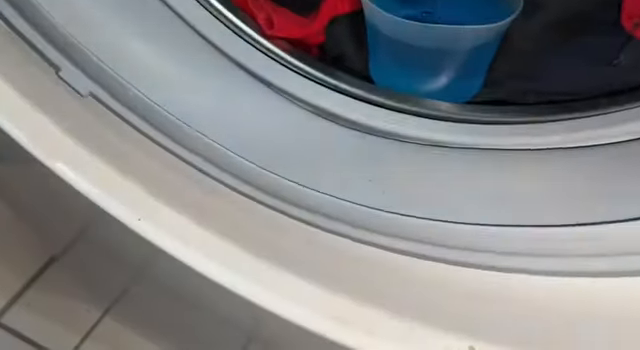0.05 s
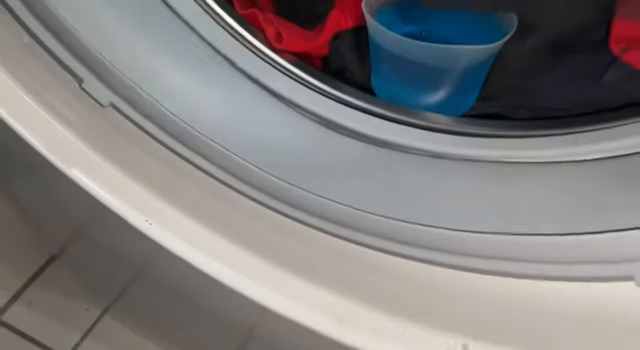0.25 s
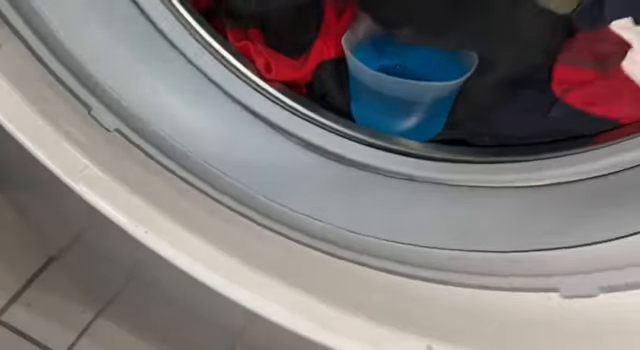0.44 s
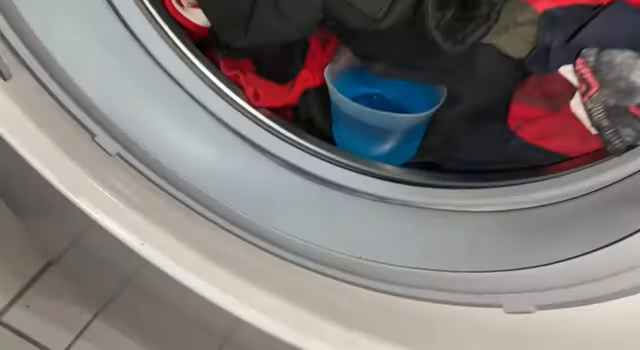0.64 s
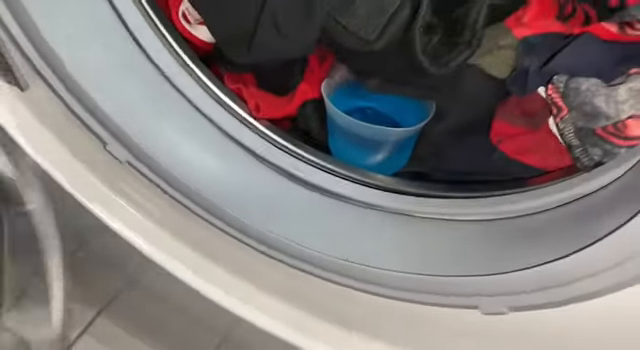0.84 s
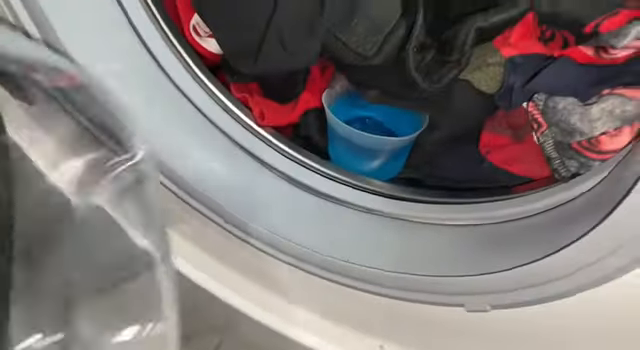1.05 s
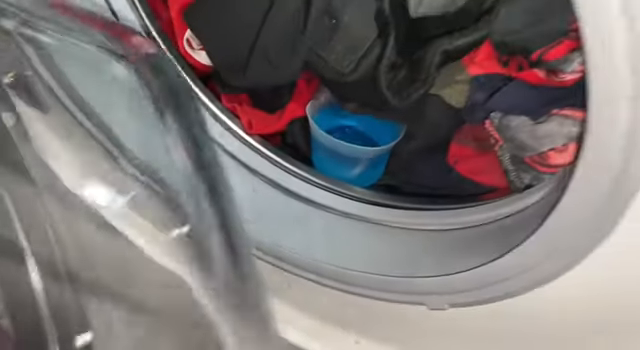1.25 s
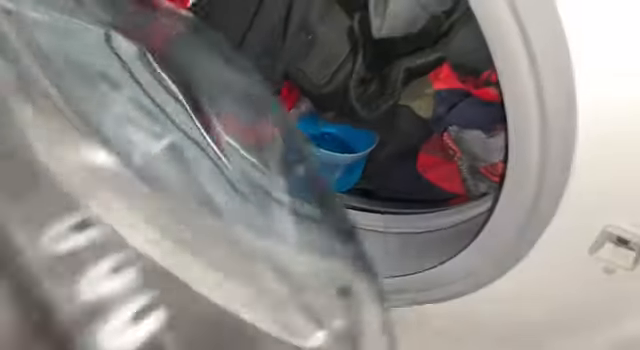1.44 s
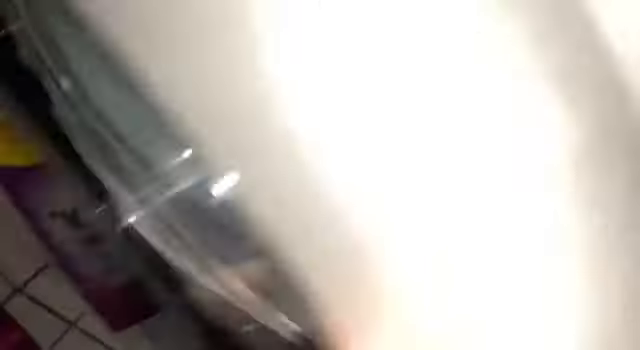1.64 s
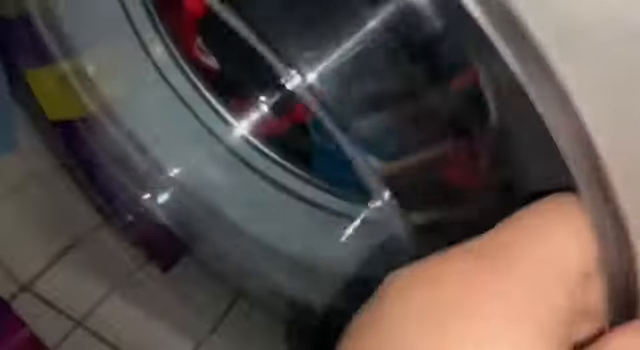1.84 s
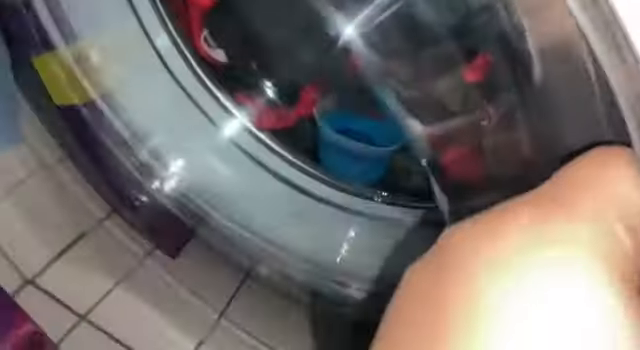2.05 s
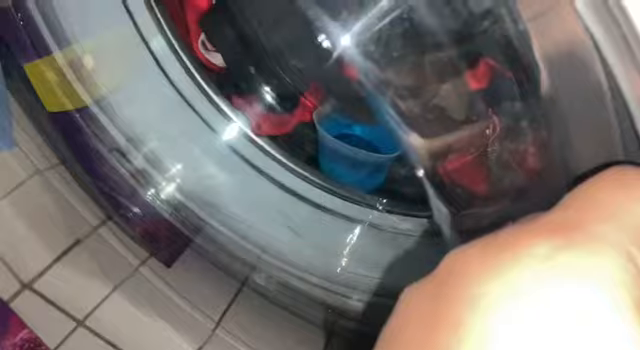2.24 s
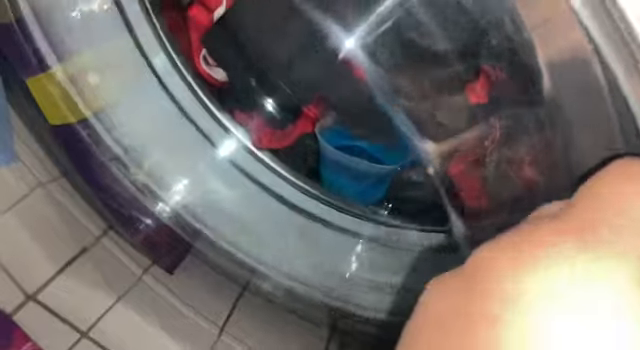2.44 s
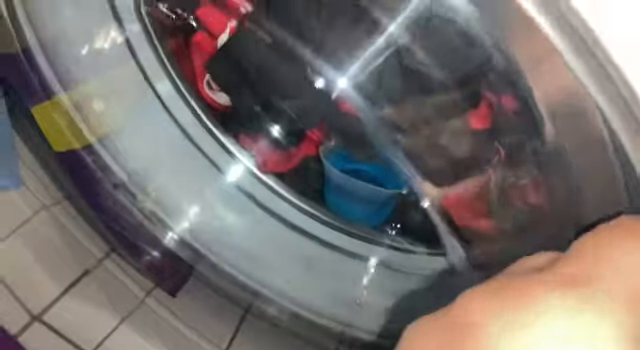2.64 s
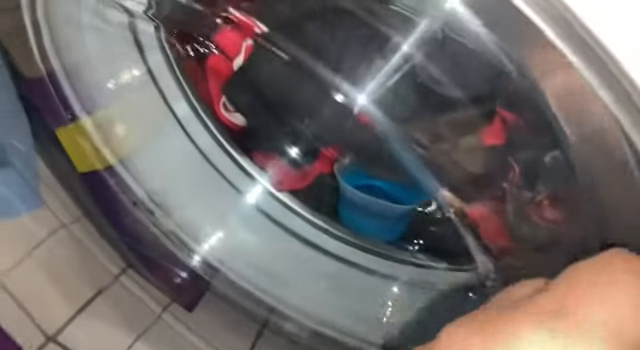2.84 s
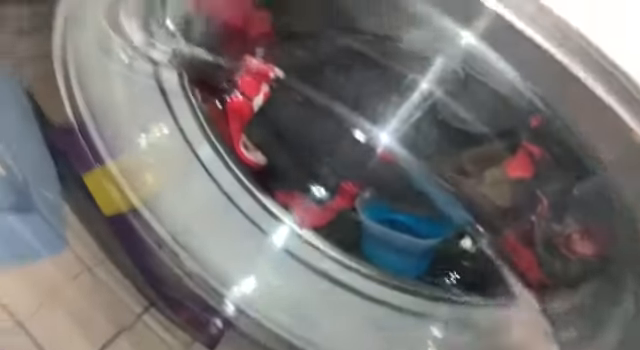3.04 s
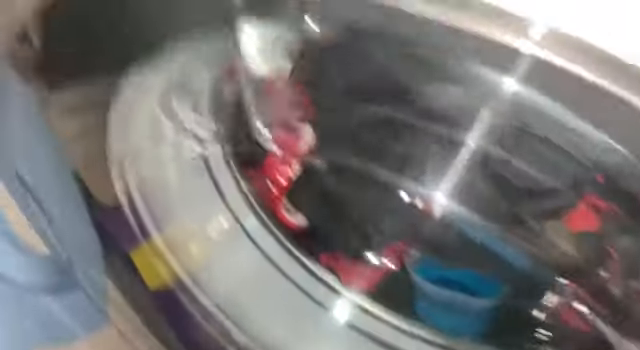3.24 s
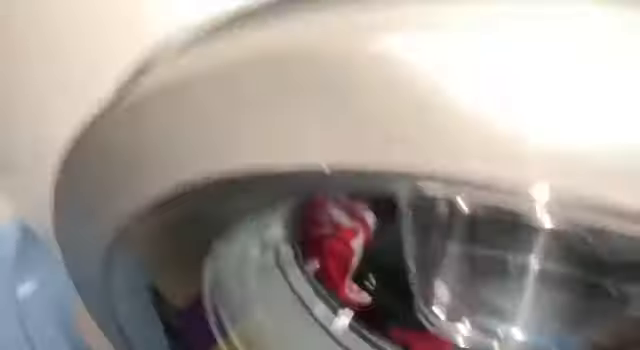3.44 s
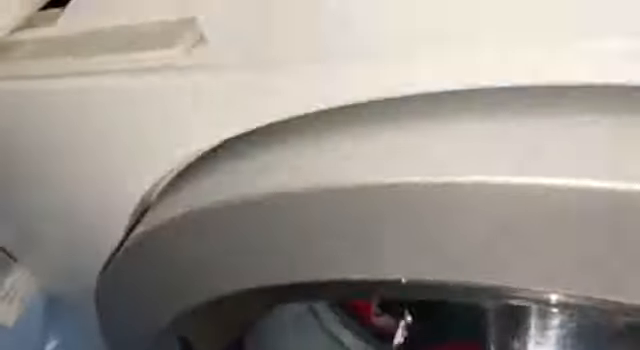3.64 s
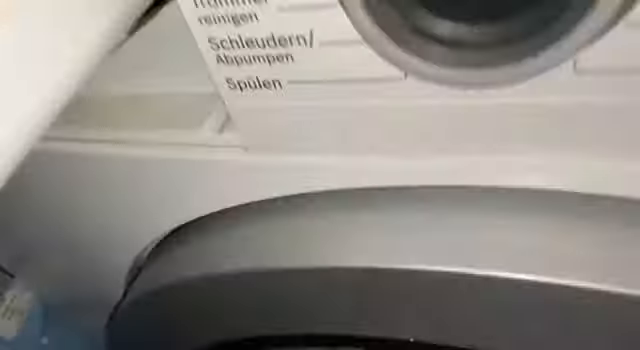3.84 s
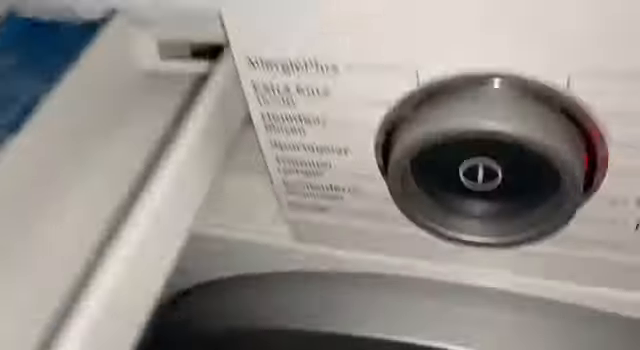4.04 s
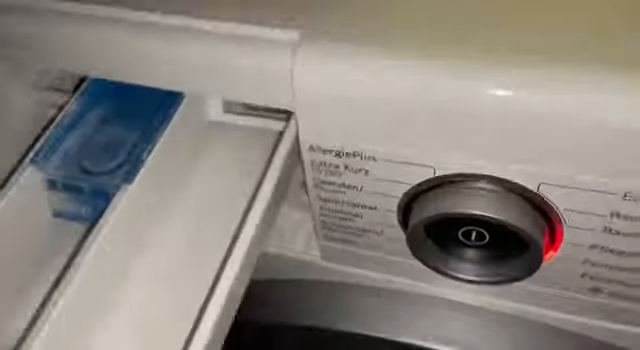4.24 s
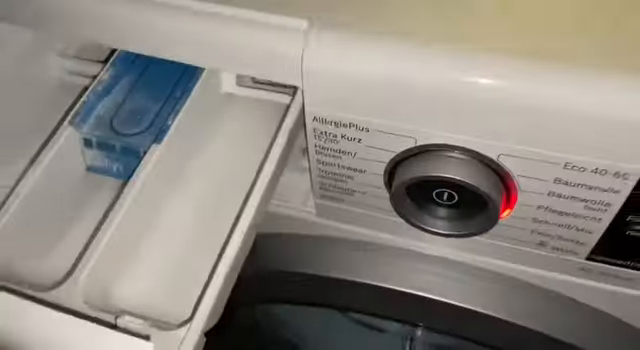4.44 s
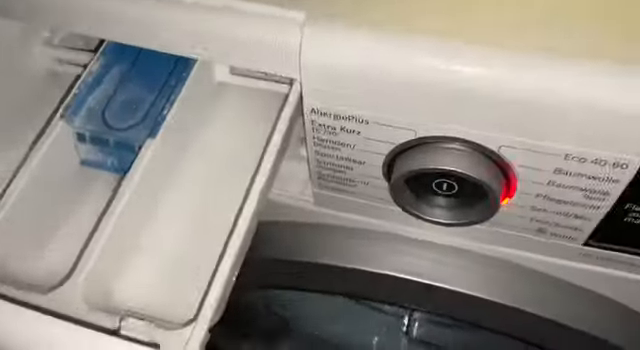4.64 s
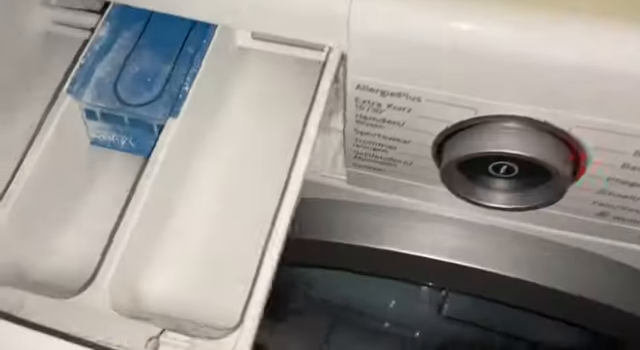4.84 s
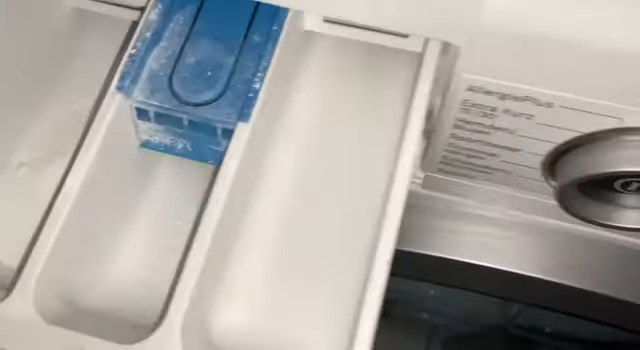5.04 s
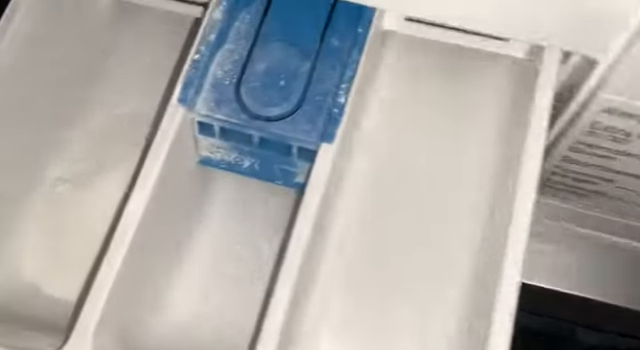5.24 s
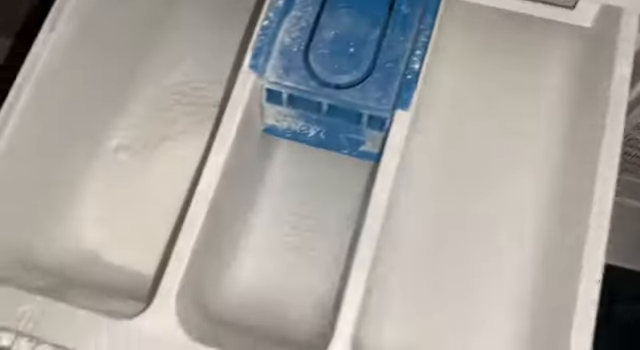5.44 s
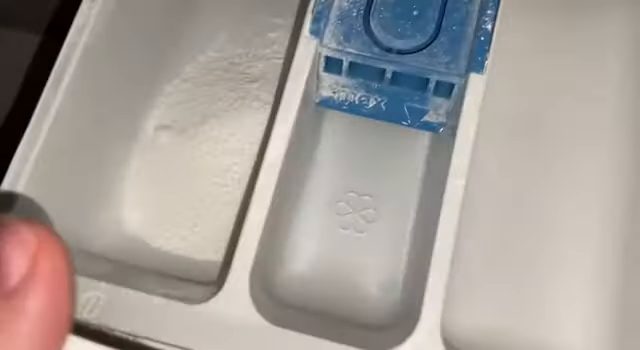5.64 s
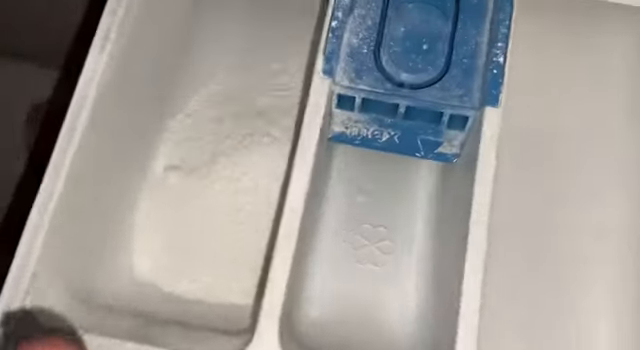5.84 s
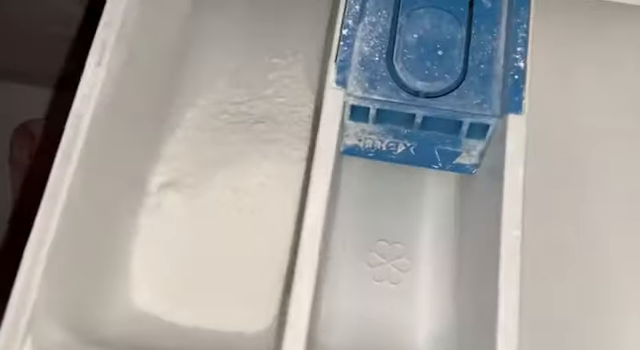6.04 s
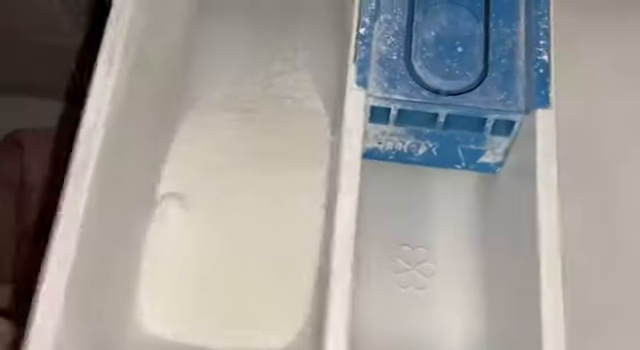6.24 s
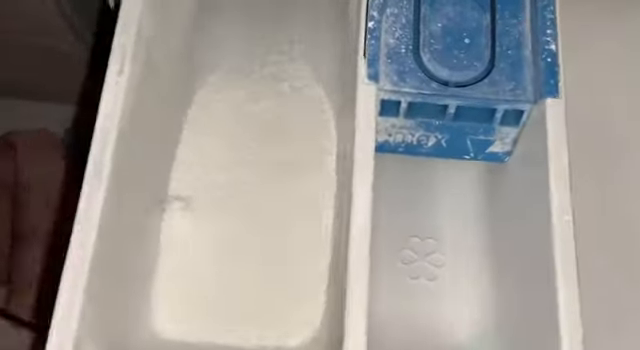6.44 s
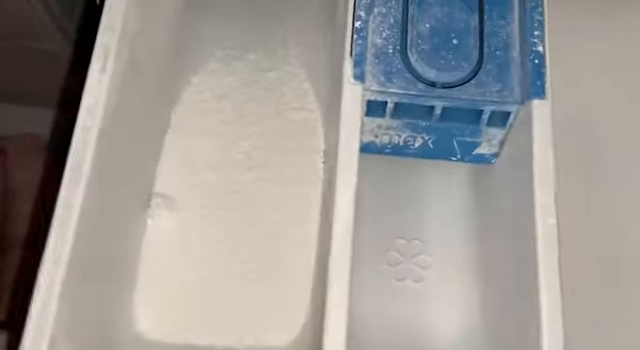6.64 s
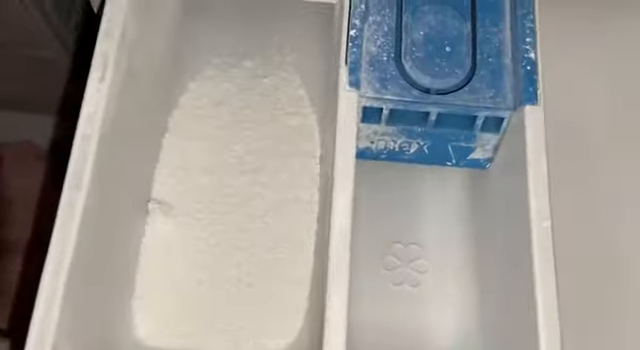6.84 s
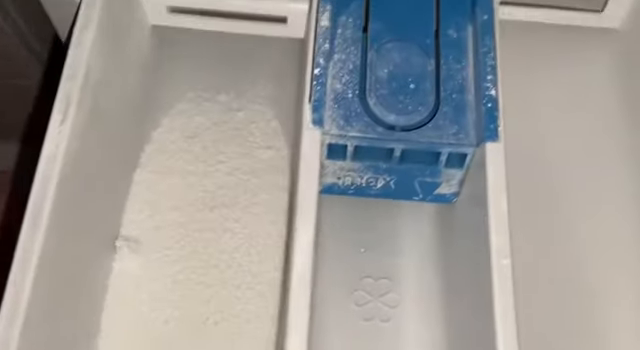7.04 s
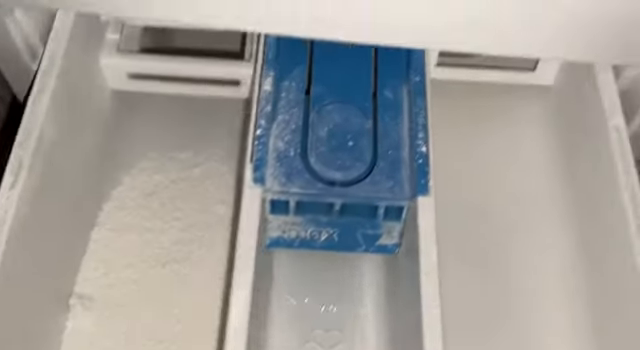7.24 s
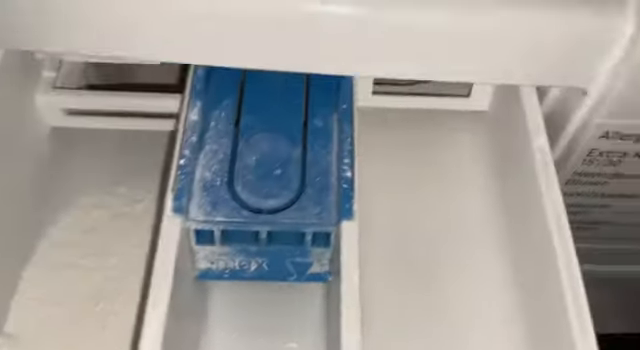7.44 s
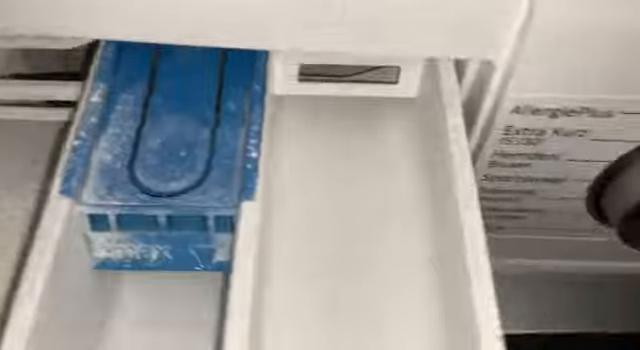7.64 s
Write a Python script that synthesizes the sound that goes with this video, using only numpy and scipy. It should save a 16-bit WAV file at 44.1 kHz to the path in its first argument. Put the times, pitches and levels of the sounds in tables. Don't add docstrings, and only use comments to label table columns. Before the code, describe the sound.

A small tiled room, heard through a handheld phone close to a washing machine. From 0 to 1.8 s it is nearly quiet: low handling rumble, faint cloth rustle, and tiny plastic hinge clacks between 0.55 and 1.2 s. Around 1.97 s the door bumps its rubber seal with a dull, moderate thud. At 2.4 to 2.45 s comes the loudest event, a tight cluster of hits: deep thump, sharp latch snap, ringing steel panels and a low boom lingering under a second. At 2.6 to 2.8 s the handle clicks back and a spring buzzes faintly. From 3.1 to 5.7 s the phone case creaks and ticks, strongest near 3.3, with sleeve hiss, rubbing soles and light taps. From 5.8 to 6.85 s a hollow plastic drawer rattles and knocks in quick uneven bursts, hardest near 6.2, 6.35 and 6.5. Soft rustle and faint creaks close by 7.7 s.

```python
import sys
import numpy as np
from scipy import signal
from scipy.fft import rfft, irfft, next_fast_len
from scipy.io import wavfile
from scipy.ndimage import uniform_filter1d, minimum_filter1d, map_coordinates

SR = 44100
rng = np.random.default_rng(int(sys.argv[2]) if len(sys.argv) > 2 else 0)


def store_wav(level_fs):
    pcm = np.round(np.clip(np.atleast_2d(level_fs), -1, 1) * 32767)
    wavfile.write(sys.argv[1], SR, pcm.T.astype(np.int16))


def elevation(decibels):
    levels = np.asarray(decibels, float)
    return 10 ** (levels / 20)


N = 339570


def unit(x):
    return x / np.sqrt(np.mean(x ** 2) + 1e-20)


def along(points, hz):
    f, v = np.transpose(points)
    return np.interp(np.log(hz + 1), np.log(f + 1), v)


def curves(rows):
    s, *cols = np.transpose(rows)
    return [np.interp(np.arange(N) / SR, s, c) for c in cols]


def wobble(rate):
    knots = rng.standard_normal(int(N * rate / SR) + 4)
    return map_coordinates(knots, [np.arange(N) * rate / SR], order=1)


def filtered(x, response):
    m = next_fast_len(x.shape[-1] + 4096)
    return irfft(rfft(x, m) * response(np.fft.rfftfreq(m, 1 / SR)), m)[..., :x.shape[-1]]


def colour(spectrum):
    return lambda hz: elevation(along([(0.0085, -120)] + list(spectrum) + [(SR / 2, -120)], hz))


def rush(spectrum, patchy_db, grain_db, grain_hz):
    z = signal.stft(rng.standard_normal((2, N)), nperseg=512)[2]
    field = uniform_filter1d(rng.standard_normal(z.shape[1:]), size=6, axis=0)
    field = uniform_filter1d(field, size=10, axis=1)
    pair = signal.istft(z * elevation(patchy_db * unit(field)), nperseg=512)[1][:, :N]
    return unit(filtered(pair * elevation(grain_db * wobble(grain_hz)), colour(spectrum)))


def add(track, s, sound):
    part = track[round(s * SR):][:len(sound)]
    part += sound[:len(part)]


def onset(seconds, rise_s):
    return 1 - np.exp(-np.arange(round(seconds * SR)) / SR / rise_s)


def ring(modes, seconds, scatter_db, shift=1):
    t = np.arange(round(seconds * SR)) / SR
    hz, db, t60 = np.transpose(modes)[:, :, None]
    sense = (-1) ** np.arange(len(modes))[:, None]
    level = elevation(db + scatter_db * rng.standard_normal(db.shape) - 60 * t / t60)
    return np.sum(sense * level * np.sin(2 * np.pi * hz * shift * t), axis=0)


def crack(t60, response, rise=0.00034):
    t = np.arange(SR // 8) / SR
    noise = unit(filtered(rng.standard_normal(len(t)), response))
    return noise * elevation(-60 * t / np.clip(t60, .002, 1)) * (1 - np.exp(-t / rise))


def swells(rows, rest_db, fade_db=22):
    t = np.arange(0, N, 64)[:, None] / SR
    s, rise, fall, db = np.transpose(rows)
    away = np.maximum((s - t) / np.abs(rise), (t - s) / np.abs(fall))
    top_db = np.max(db - fade_db * away, axis=1)
    return np.maximum(np.interp(np.arange(N) / SR, t[:, 0], top_db), rest_db)


# [t/s, thump level/dB, panel level/dB, contact time/ms]
DOOR_BLOWS = [(1.885, -75.5, -55.5, 6.3), (1.904, -58.5, -40.5, 1.2), (1.936, -62, -38, 1),
              (1.972, -18.5, -17.5, 3.1), (1.984, -37.5, -49, 1.6), (2.328, -63, -49, 0.78),
              (2.385, -42.5, -25, 1), (2.399, -13.5, -22.5, 1), (2.426, -31.5, -14.5, 2.6),
              (2.436, -3, -12.5, 6.5), (2.446, -28, -1, 2.4), (2.455, -34, -20.5, 2)]
# [f/Hz, level/dB, time to die by 60 dB/s]
PANEL_NOTES = [(200, -6.5, 0.24), (220, -11, 0.15), (263, -13, 0.3), (307.5, -2, 0.15), (361, -4.5, .3),
               (387.5, -4.5, 0.2), (443, -8, 0.16), (525, -10.5, .3), (600, -10.5, 0.22),
               (815, -10.5, 0.13), (1110, -5.5, 0.12), (1280, -3.5, .15), (1444, -13.5, .07)]
# [f/Hz, level/dB, time to die by 60 dB/s]
SHELL_NOTES = [(30, -23.5, 0.88), (61.5, 1.5, 0.77), (94, 0, 0.33), (140, -5, 0.58), (153.87, -5, 0.4)]
# [f/Hz, level/dB]
THUD_COLOUR = [(60, -21), (110, 11), (250, 1), (400, -3), (800, -11.5), (1500, -24), (2500, -30)]


def blows():
    lows, hits = np.zeros((2, N))
    t = np.arange(round(1.5 * SR)) / SR
    squash_hz, squash_s = 23, 0.022
    lag_turns = .28
    cycles = 64.5 * t + squash_hz * squash_s * (1 - np.exp(-t / squash_s)) - lag_turns
    thump = 5.6 * (t / 0.02056) ** 2 * np.exp(-t / 0.014) * np.sin(2 * np.pi * cycles)
    hum = ring(SHELL_NOTES, 1.5, 0) * onset(1.5, 0.061)
    for s, thump_db, panel_db, contact_ms in DOOR_BLOWS:
        push = np.hanning(round(contact_ms * SR / 1000) + 3)
        add(lows, s, elevation(thump_db) * thump + elevation(1.365 * thump_db + 0.5) * hum)
        panels = ring(PANEL_NOTES, .6, 2.5)
        add(hits, s, elevation(panel_db - 17.0) * np.convolve(panels, push / push.sum()))
        add(hits, s, elevation(panel_db + 0.5) * crack(0.051, colour(THUD_COLOUR), rise=0.0048))
    return lows, hits


# [t/s, peak level/dB, tilt/dB per octave]
LATCH_HITS = [(1.933, -57, -1), (1.9702, -33, -3.5), (2.002, -48.5, 2.5), (2.3281, -41, -1),
              (2.358, -45, 3), (2.3881, -15, -9.5), (2.395, -20, -4.5), (2.4268, -6, 1.5),
              (2.434, -11.5, -8.5), (2.4458, -20, 3.5), (2.4533, -10, -1.5), (2.4634, -32, -6.5),
              (2.612, -33, -7)]
# [f/Hz, level/dB]
SNAP_COLOUR = [(300, -13), (900, 3), (2200, -4), (3300, 3), (5500, -2.5), (8000, -2.5), (10500, -8.5),
               (12400, -10.5)]


def latch():
    ticks = np.zeros(N)
    for s, db, tilt_db in LATCH_HITS:
        tilted = lambda hz: colour(SNAP_COLOUR)(hz) * elevation(tilt_db * np.log2((hz + 1) / 3000))
        add(ticks, s, elevation(db - 6.0) * crack(0.028, tilted, rise=0.0011))
    return ticks


# [f/Hz, level/dB, time to die by 60 dB/s]
BOWL_NOTES = [(250, -8, 0.023), (299, -3, 0.068), (361, 3, 0.077), (390, -1, 0.06), (614, -7.5, 0.052),
              (1405, -13, 0.046)]


def bowl():
    x = np.zeros(N)
    t = np.arange(SR // 4) / SR
    notes = sum(elevation(db - 60 * t / t60) * np.sin(2 * np.pi * hz * t) for hz, db, t60 in BOWL_NOTES)
    add(x, 2.439, elevation(-14.5) * onset(1 / 4, 0.0043) * notes)
    return x


# [f/Hz, level/dB, time to die by 60 dB/s]
HOOK_NOTES = [(3500, -4, .06), (3720, -8, .05), (4110, -6, .05), (10870, -6, .04)]


def hook():
    x = np.zeros(N)
    add(x, 2.44, elevation(-24.5) * ring(HOOK_NOTES, .3, 0))
    return x


# [t/s, peak level/dB]
SPRING_BUZZES = [
    (2.664, -49),
    (2.679, -42),
    (2.6915, -49.5),
    (2.7068, -41),
    (2.7178, -40),
    (2.729, -46.5),
    (2.7435, -42.5),
    (2.7653, -44.5),
]
# [f/Hz, level/dB]
COIL_COLOUR = [(1500, -5), (2600, -1.5), (3600, -14), (5100, -3), (7500, 1.5), (9000, -9), (10100, 2),
               (11500, -17)]


def handle_and_spring():
    x = np.zeros(N)
    handle = [(808, 7.0, 0.033), (1201, 4.5, 0.011), (2240, -22, 0.0071), (3500, -1.5, 0.0098)]
    add(x, 2.613, elevation(-22.5) * ring(handle, .08, 0))
    for s, db in SPRING_BUZZES:
        add(x, s, elevation(db + 7.0) * crack(0.0075, colour(COIL_COLOUR), rise=0.00074))
    return x


# [t/s, peak level/dB, f/Hz, bright level/dB]
HINGE_KNOCKS = [
    (0.553, -43, 297, -30),
    (0.674, -48.5, 1480, 5.5),
    (.783, -51.5, 656, 7),
    (0.876, -57, 526, 11),
    (0.914, -44.5, 1520, -1),
    (1.156, -52.5, 322, -15),
]
# [f/Hz, level/dB]
CLACK_COLOUR = [(250, -4.5), (500, 6), (1000, 7.5), (2000, -6), (3000, -2), (4500, -13), (8000, -26.5)]
# [f/Hz, level/dB]
SOLE_COLOUR = [(500, -21.5), (1000, -9.5), (1700, -5.5), (2400, -4), (3200, -1), (4500, -7.5), (7000, -16),
               (12000, -34.5)]


def hinge():
    knocks, ticks = np.zeros((2, N))
    for s, db, hz, bright_db in HINGE_KNOCKS:
        clack = crack(.05, colour(CLACK_COLOUR), rise=.002)
        add(knocks, s, elevation(db - 4) * (clack + .5 * ring([(hz, 0, .025)], 1 / 8, 0)))
        add(ticks, s, elevation(db + bright_db) * crack(0.02, colour(SOLE_COLOUR), rise=0.0027))
    return knocks, ticks


def door():
    lows, hits = blows()
    knocks, hinge_ticks = hinge()
    ticks = latch() + bowl() + hinge_ticks
    return lows + handle_and_spring() + ticks, hits + hook() + knocks + elevation(-0.5) * ticks


# [contact t/s, level/dB, build-up time/s]
DRAG_EVENTS = [
    (1.936, -58.5, 0.072),
    (1.972, -45.5, 0.034),
    (2.389, -41, 0.036),
    (2.428, -33, 0.05),
    (5.918, -58, 0.045),
]


def drags():
    x = np.zeros(N)
    for s, db, build_s in DRAG_EVENTS:
        add(x, s - 1 / 8, elevation(db) * crack(2 * build_s, colour(SNAP_COLOUR), rise=0.0034)[::-1])
    return x


# [t/s, peak level/dB, tray ring level/dB, bright level/dB, wall f/Hz]
STOP_HITS = [
    (5.915, -22.5, -17, -6, 581),
    (6.004, -20.5, -2.5, -37, 814),
    (6.102, -26, 1, -23, 568.5),
    (6.180, -14.5, -3, -30, 1005),
    (6.267, -27, -3, -19.5, 455.3),
    (6.343, -12.5, -5.5, -10.5, 1107),
    (6.506, -10, -11.5, -12, 1009),
]
# [t/s, peak level/dB, tray ring level/dB, bright level/dB, wall f/Hz]
RAIL_KNOCKS = [(5.792, -34, -6.5, -19, 1067), (5.812, -27.5, -12, -20.5, 571),
               (5.896, -36, 1.5, -37, 525.5), (5.925, -23.5, 3.5, 1, 1324), (5.970, -29, 8, -9.5, 600),
               (5.992, -28, -2, -26, 821), (6.088, -30.5, 1.5, -22, 700), (6.108, -28.5, 4.5, -20, 548),
               (6.259, -29.5, 0, -28, 1181), (6.277, -22, -9.5, -24, 1085), (6.36, -31.5, -4, 11.5, 810),
               (6.38, -31.5, -1.5, -17.5, 823), (6.402, -18, -12.5, -37.5, 820),
               (6.429, -18, -8, -23.5, 600), (6.451, -29, -7, 3.5, 664), (6.485, -29, -3, -26, 900),
               (6.522, -33, 4.5, -15.5, 803), (6.55, -24.5, -9.5, -29.5, 826),
               (6.578, -19, -9.5, -23.5, 526), (6.582, -30.5, 9, -31, 800), (6.608, -43.5, -4, -20.5, 813),
               (6.648, -35, -2.5, -34, 684), (6.668, -34.5, 1, -15, 608), (6.69, -46.5, 12.5, -27, 497),
               (6.734, -57, 12, -20.5, 600), (6.791, -42, 2.5, -34, 652), (6.825, -26.5, -7, -26, 1126)]
# [f/Hz, level/dB, time to die by 60 dB/s]
TRAY_NOTES = [(178.5, -9.5, 0.094), (210, 2.5, 0.15), (255, -10.5, 0.051), (314, -18, 0.21)]
# [f/Hz, level/dB, time to die by 60 dB/s]
WALL_NOTES = [(413, 4.5, 0.1), (595, 8, 0.045), (803, 19.5, 0.04), (1020, 6, 0.0089), (1350, -2, 0.0079),
              (1990, -6.5, 0.082), (2675, 3, 0.0087)]
# [t/s, f/Hz]
HOLLOW_PITCH = [(5.9, 236.4), (6.0, 221.7), (6.1, 239), (6.18, 202.2), (6.27, 202.7), (6.34, 206.3),
                (6.43, 227.4), (6.58, 222.3), (6.65, 244.6), (6.83, 240)]


def drawer():
    hollow, x = np.zeros((2, N))
    touches = [(s - .0115, db - 17.5, tray_db + 9, -18, hz) for s, db, tray_db, _, hz in STOP_HITS]
    for s, db, tray_db, bright_db, wall_hz in STOP_HITS + RAIL_KNOCKS + touches:
        spot = 1 + .08 * rng.standard_normal()
        shift = np.interp(s, *np.transpose(HOLLOW_PITCH)) / TRAY_NOTES[1][0]
        tray = onset(1 / 4, 0.0043) * ring(TRAY_NOTES, 1 / 4, 2.5, shift=shift)
        add(hollow, s, elevation(db + tray_db + 1.5) * tray)
        walls = ring(WALL_NOTES, 1 / 8, 5, shift=spot)
        struck = ring([(wall_hz, 0, .035)], 1 / 8, 0)
        tilted = lambda f: colour(CLACK_COLOUR)(f) * elevation(9 * (spot - 1) * np.log2((f + 1) / 1500))
        clack = crack(0.038, tilted, rise=0.00099)
        add(x, s, elevation(db - 3.5) * (clack + 0.06 * walls + 0.81 * struck))
        add(x, s, elevation(db + bright_db + 2.0) * crack(0.011, colour(SNAP_COLOUR), rise=0.00067))
        add(x, s - 1 / 8, elevation(db - 15) * crack(6 * 0.0071, colour(CLACK_COLOUR), rise=0.0022)[::-1])
    return hollow, x


# [t/s, level/dB]
SHAKE_EFFORT = [
    (5.76, -82.5),
    (5.838, -61.5),
    (5.982, -44),
    (6.144, -53),
    (6.442, -43),
    (6.55, -46),
    (6.85, -60.5),
    (6.95, -75.5),
    (7.05, -97),
]
# [f/Hz, level/dB]
RATTLE_COLOUR = [(150, -21.5), (250, -9), (600, 2), (1200, -16.5), (2500, -22.5), (5000, -34),
                 (11000, -32.5)]
# [f/Hz, level/dB]
SCRAPE_COLOUR = [(800, -7), (1500, -0.5), (2500, -7), (3500, -14.5), (5500, -5.5), (8000, -15.5),
                 (11000, -5.5)]
# [f/Hz, level/dB]
RUMBLE_COLOUR = [(20, -40), (35, -11), (60, -1), (85, -1.5), (130, -7)]


def shaking():
    effort_db, = curves([(5.75, -110)] + list(SHAKE_EFFORT) + [(7.1, -110)])
    late = lambda lag_s, db: elevation(np.roll(effort_db, round(lag_s * SR)) + db)
    rails = rush(RATTLE_COLOUR, patchy_db=2, grain_db=5, grain_hz=150)
    shell = rush(RUMBLE_COLOUR, patchy_db=1, grain_db=2, grain_hz=12)
    fizz = rush(SCRAPE_COLOUR, patchy_db=3, grain_db=6, grain_hz=90)
    t = np.arange(N) / SR
    lid_db = 3.5 * wobble(25) + np.interp(t, (6.25, 6.42), [-10.5, 0])
    lid = elevation(lid_db) * np.sin(2 * np.pi * 141.3 * t + 0.79 * wobble(30))
    rattle = elevation(effort_db) * (rails + elevation(-18) * fizz)
    return rattle + late(0.035, 5) * shell + late(0.056, 10.5) * lid * [[1], [0]]


# [t/s, peak level/dB]
CASE_SQUEEZES = [(3.157, -47.5), (3.2, -53), (3.251, -45), (3.299, -48), (3.324, -28.5), (3.337, -38.5),
                 (3.349, -30.5), (3.36, -41.5), (4.007, -44), (4.094, -50), (4.198, -43.5), (4.211, -37),
                 (4.222, -46), (4.23, -48), (4.721, -57), (5.745, -54), (7.02, -40), (7.08, -44.5),
                 (7.205, -52)]
# [t/s, peak level/dB]
CASE_SLIPS = [(3.615, -42.5), (3.67, -35), (3.777, -41), (3.835, -43.5), (3.881, -46.5), (3.903, -50),
              (3.924, -47), (4.058, -49), (4.147, -52), (4.259, -43), (4.33, -36), (4.435, -33.5),
              (4.464, -52), (4.579, -48.5), (4.683, -56), (4.71, -43.5), (4.787, -45.5), (4.798, -47.5),
              (4.857, -50), (4.959, -49), (5.032, -63), (5.06, -47), (5.26, -48), (5.661, -54),
              (7.582, -58), (7.605, -54), (7.635, -48.5), (7.672, -52)]
# [t/s, f/Hz]
CASE_PITCH = [(3.36, 595), (3.6, 508), (4.0, 511), (4.35, 653), (5.0, 617), (7.2, 620), (7.55, 499.2)]
# [f/Hz, level/dB]
TICK_COLOUR = [(300, 3.5), (500, -5), (1000, 2.5), (1700, -30), (2400, -41)]


def creaks():
    x = np.zeros(N)
    swell = onset(.06, 0.0021) ** 2
    rows = [(s, db, -44) for s, db in CASE_SQUEEZES]
    rows += [(s, db, -4 - 0.33 * (db + 50)) for s, db in CASE_SLIPS]
    for s, db, bright_db in rows:
        hz = np.interp(s, *np.transpose(CASE_PITCH)) * (1 + .04 * rng.standard_normal())
        notes = [(hz, -.5, .022), (1080, bright_db - 26.0, .014), (1630, bright_db - 2.0, .014)]
        add(x, s - 0.00194, elevation(db + 13.0) * swell * ring(notes, .06, 0.41))
        add(x, s, elevation(db + bright_db + 9) * crack(.012, colour(TICK_COLOUR)))
    return x


# [t/s, peak level/dB, f/Hz, time to die by 60 dB/s]
TAP_EVENTS = [(0.557, -46.5, 156, 0.12), (4.338, -57, 155, 0.11), (4.443, -52.5, 151, 0.09),
              (4.845, -53, 180.6, 0.045), (4.884, -52, 673, 0.019), (4.906, -41.5, 177.8, 0.035),
              (5.032, -36, 1020, 0.022), (5.043, -42, 940, .025), (5.072, -43, 600, 0.014),
              (5.417, -37.5, 390, 0.018), (5.559, -44, 600, 0.012), (5.566, -44, 200.7, 0.098),
              (5.612, -46.5, 263, 0.088), (6.831, -34, 326, 0.11), (6.982, -55.5, 610, 0.042),
              (2.331, -52.5, 250, 0.094), (2.359, -42, 295, 0.072), (2.379, -46, 930, 0.074),
              (4.03, -46, 890, 0.011), (4.115, -55, 604, .04), (4.51, -50, 567, 0.051),
              (4.527, -47.5, 559, 0.036)]


def taps():
    x = np.zeros(N)
    swell = onset(.15, 0.0014)
    for s, db, hz, t60 in TAP_EVENTS:
        add(x, s, elevation(db + 1.5) * swell * ring([(hz, 0, t60), (1.49 * hz, -6, 0.75 * t60)], .15, 0))
    return x


# [peak t/s, rise/s, fall/s, sole level/dB, cloth level/dB]
RUB_STROKES = [(0, 0.008, 0.2, -87, -73.5), (.3, 1, 0.69, -89, -79.5), (0.561, 0.0087, 3.5, -78.5, -74.5),
               (.8, 0.47, 1, -76.5, -69.5), (1.624, 0.25, 0.15, -74, -55), (1.92, 0.69, 1, -88, -80),
               (2.4, 0.06, 0.42, -58, -58), (2.778, 0.88, 0.037, -72, -76), (3.001, 0.073, 1.3, -77.5, -64),
               (3.298, 0.7, 0.76, -74, -71), (3.44, 0.18, 0.12, -64.5, -64.5),
               (3.991, 0.51, 0.31, -71, -63.5), (4.347, 0.003, 0.097, -59.5, -75),
               (4.379, 0.13, 0.43, -71.5, -70.5), (4.64, .004, 0.13, -69, -78),
               (4.851, 0.016, 0.14, -61, -64), (5.05, 0.065, 0.32, -59, -61.5),
               (5.421, 0.0051, 0.116, -60.5, -52.5), (5.447, 0.036, 0.088, -54, -52),
               (5.6, 0.22, 0.14, -70.5, -66), (7.2, 0.054, 0.52, -104.5, -71),
               (7.339, 0.25, 0.17, -75.5, -68.5), (7.491, 0.14, 0.19, -67, -69)]
# [f/Hz, level/dB]
CLOTH_COLOUR = [(1500, -22), (3500, -7.5), (5500, -2), (7500, -6.5), (10500, -2.5), (12300, -7.5)]


def rustle():
    rows = np.array(RUB_STROKES)
    still_db = -96
    soles_db = swells(rows[:, :4], still_db)
    cloth_db = swells(rows[:, [0, 1, 2, 4]], still_db)
    soles = rush(SOLE_COLOUR, patchy_db=3, grain_db=2.5, grain_hz=120)
    cloth = rush(CLOTH_COLOUR, patchy_db=1.5, grain_db=1.5, grain_hz=60)
    return elevation(soles_db + 14.5) * soles + elevation(cloth_db + 4.5) * cloth


# [t/s, level/dB]
BODY_MOTION = [(0, -65), (.8, -69.5), (1.88, -64), (3.05, -61), (3.35, -53), (3.76, -61), (4.43, -59.5),
               (4.74, -93), (4.87, -60.5), (5.26, -69), (5.61, -65), (5.78, -80), (7.05, -70), (7.25, -72),
               (7.52, -76), (7.7, -67)]
# [t/s, body level/dB, grip level/dB]
WEIGHT_SHIFTS = [(.56, -55.5, -68.5), (.85, -62.5, -63.5), (1.15, -58.5, -63.5), (1.29, -61, -69),
                 (1.88, -62, -72), (3.333, -57, -56.5), (3.763, -64.5, -73), (4.199, -64.5, -55.5),
                 (4.43, -61, -73), (4.87, -62, -80.5), (5.45, -55.5, -67.5), (5.608, -61, -64.5),
                 (7.681, -69, -65)]
# [f/Hz, level/dB]
BODY_COLOUR = [(80, -19), (150, 4), (220, 2), (330, 2), (500, -16.5)]
# [f/Hz, level/dB]
GRIP_COLOUR = [(330, -22.5), (480, -3.5), (560, -2), (720, -7), (950, -20), (1600, -22.5), (2200, -37.5)]


def hand():
    motion_db, = curves(BODY_MOTION)
    over_calm_db = motion_db + 69
    rise_s, fall_s = 0.22, 0.39
    body_rows = [(s, rise_s, fall_s, db) for s, db, _ in WEIGHT_SHIFTS]
    body_db = swells(body_rows, -69.5 + 0.44 * np.minimum(over_calm_db, 0))
    body_db += -8 * (np.abs(np.arange(N) / SR - 7.2) < 0.3)
    grip_rows = [(s, 2 * rise_s, 2 * fall_s, db) for s, _, db in WEIGHT_SHIFTS]
    grip_db = swells(grip_rows, -71 + 0.11 * over_calm_db)
    low = rush(RUMBLE_COLOUR, patchy_db=1, grain_db=2, grain_hz=9)
    body = rush(BODY_COLOUR, patchy_db=2, grain_db=3, grain_hz=25)
    grip = rush(GRIP_COLOUR, patchy_db=1, grain_db=5, grain_hz=70)
    return elevation(motion_db) * low + elevation(body_db) * body + elevation(grip_db) * grip


# [f/Hz, time to die by 60 dB/s]
ROOM_T60 = [(100, 0.85), (500, 0.26), (2000, 0.24), (6000, 0.24), (11000, 0.077)]


def room(x, wet_db, shade_db=0):
    hz, t, z = signal.stft(rng.standard_normal((2, SR // 2)), SR, nperseg=256)
    tail = signal.istft(z * elevation(-60 * t / along(ROOM_T60, hz)[:, None]), SR, nperseg=256)[1]
    near = tail[1] * np.exp(-np.arange(tail.shape[1]) / SR / 0.0075)
    small = lambda hz: 1 / (1 + (250 / (hz + 1)) ** 2)
    tail = elevation(wet_db) * filtered(tail / np.linalg.norm(tail[0]), small)
    tail[1] += elevation(shade_db - 2) * near / np.linalg.norm(near)
    wet = signal.fftconvolve(x[None], tail, axes=1)[:, :N]
    wet[0] += x
    return wet


# [f/Hz, likeness 0 to 1]
PORT_LIKENESS = [(60, .98), (300, .88), (900, .45), (3000, .66), (4000, .45), (5000, .9), (6200, .9),
                 (6800, .995), (8000, .995), (9000, .9)]
# [f/Hz, phase/rad]
PORT_LEAD = [(50, 0), (450, -1), (1500, -.7), (3300, -2.9), (3900, -4.3), (4550, -3.6), (5300, -6.28),
             (6800, -3.0), (8000, -2.7), (9700, 0)]
# [f/Hz, phase/rad]
BEND_LEAD = [(450, .3), (1700, -4.9), (2200, -4.2), (3000, -6.28), (3300, -6.5), (3900, -6.28)]


def ports(pair, bend, pan_db, spread=1):
    turn = lambda hz: np.arccos(along(PORT_LIKENESS, hz) ** spread) / 2
    shared, apart = filtered(pair, lambda hz: np.array([np.cos(turn(hz)), np.sin(turn(hz))]))
    sides = np.array([[1], [-1]])
    lead = lambda hz: along(PORT_LEAD, hz) + bend * along(BEND_LEAD, hz) * (hz > 100)
    both = filtered(shared + sides * apart, lambda hz: np.exp(.5j * sides * lead(hz)))
    return both * elevation(sides * pan_db / 2)


def turned(x):
    slip = 14e-6 * SR * wobble(5)
    late = lambda port, side: map_coordinates(port, [np.arange(N) + side * slip / 2], mode="nearest")
    return np.array([late(x[0], 1), late(x[1], -1)])


def masked(x):
    hz, _, z = signal.stft([x[0] + x[1], x[0] - x[1]], SR, nperseg=2048)
    power = uniform_filter1d(np.abs(z) ** 2, size=2, axis=2)
    power = uniform_filter1d(power, size=10, axis=1)[:, np.arange(len(hz)) // 10 * 10 + 4]
    keep = (power * elevation(2 * 5.5) > power[::-1]) | (hz < 1300)[:, None]
    mid, side = signal.istft(z * keep, SR, nperseg=2048)[1][:, :N] / 2
    n = round(.008 * SR)
    treble = np.sum(np.diff(x, n=2, prepend=0, append=0) ** 2, axis=0)
    treble = np.abs(uniform_filter1d(treble, size=n // 2))
    calm = 1. * (np.roll(treble, -n // 2) < np.roll(treble, n // 2) * elevation(2 * 15))
    calm = uniform_filter1d(minimum_filter1d(calm, size=n, origin=n // 2 - 1), size=n // 4)
    return x + calm * (np.array([mid + side, mid - side]) - x)


def scene():
    dry, hits = door()
    front = room(hits, wet_db=0.0) + [dry, 0 * dry]
    front += room(drags(), wet_db=-3.5)
    hollow, clatter = drawer()
    tray = room(clatter, wet_db=-13.0, shade_db=-5.5) + [hollow, 0 * hollow] + shaking()
    held = room(creaks() + taps(), wet_db=-11.5, shade_db=-13.5) + rustle() + hand()
    mix = ports(front, 1, pan_db=-.8, spread=2.5)
    mix += ports(tray, 1, pan_db=-3.6, spread=1.7)
    mix += ports(held, 0, pan_db=.8)
    return turned(mix)


def band_limit(x):
    return signal.sosfilt(signal.butter(12, 12510, fs=SR, output="sos"), x)


def record(dry):
    x = filtered(dry, lambda hz: 1 / (1 + (hz / 11850) ** 60))
    x = x / (1 + np.abs(x / .98) ** 6) ** (1 / 6)
    mix = masked(x)
    return band_limit(mix)


dry = scene()
out = record(dry)
store_wav(out)
```